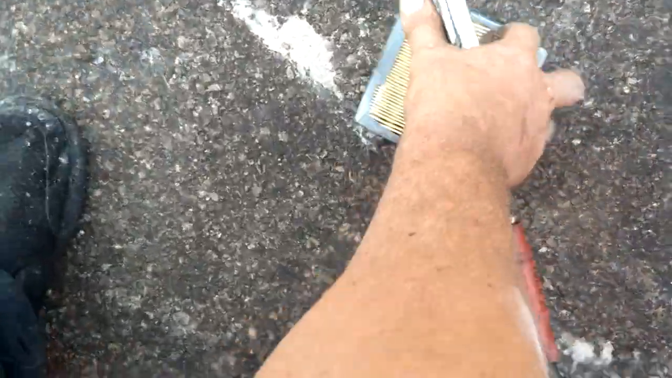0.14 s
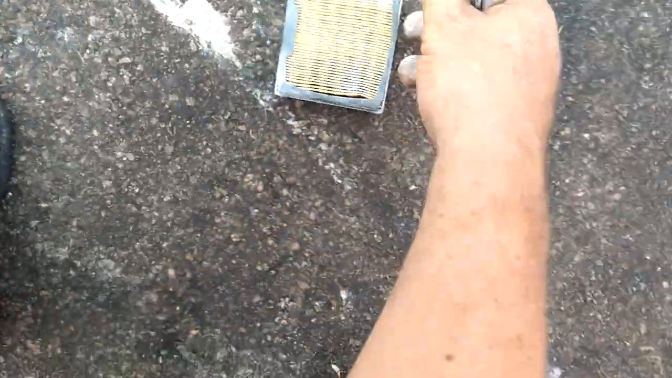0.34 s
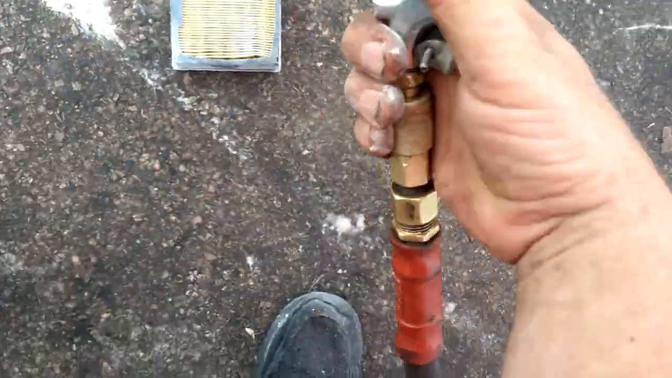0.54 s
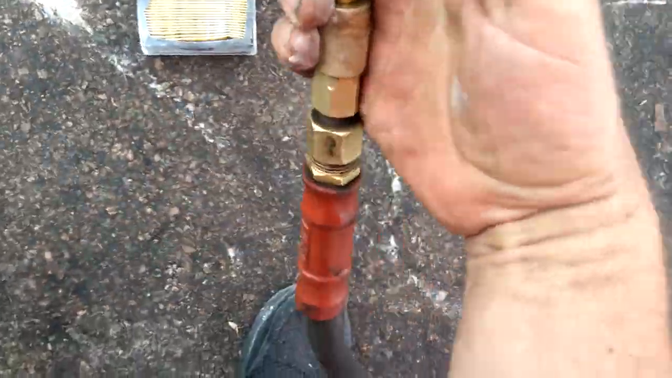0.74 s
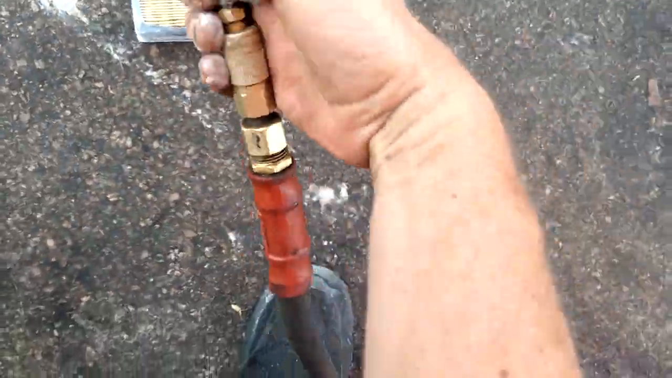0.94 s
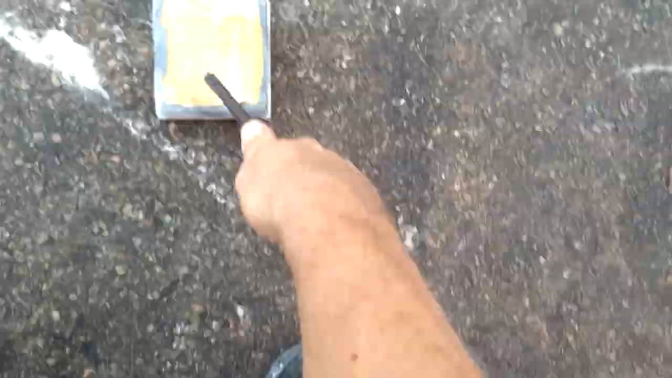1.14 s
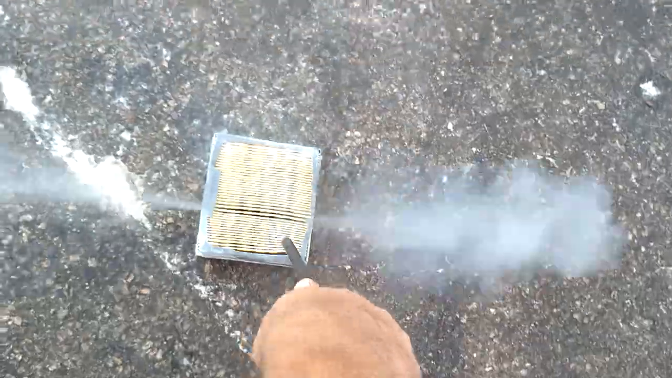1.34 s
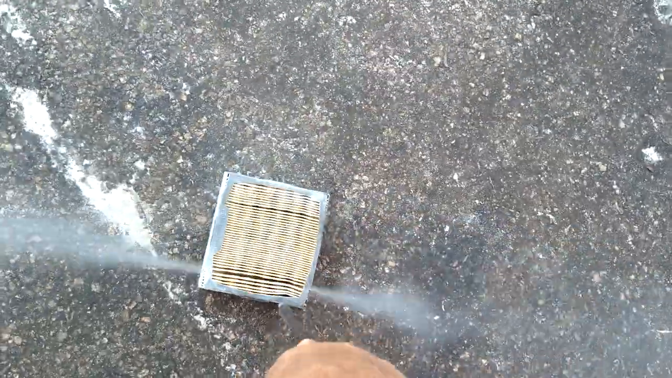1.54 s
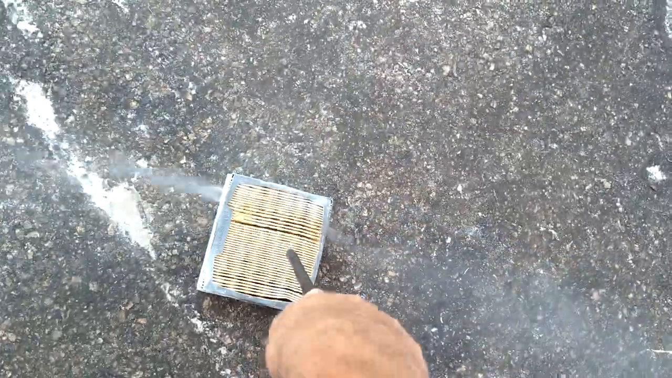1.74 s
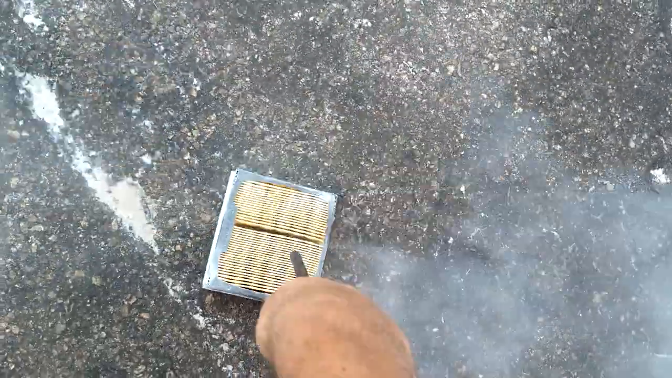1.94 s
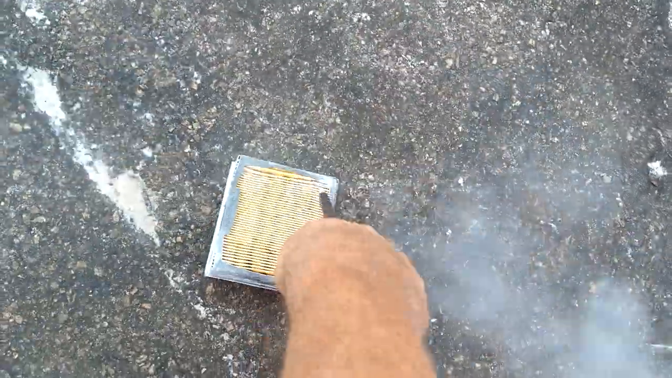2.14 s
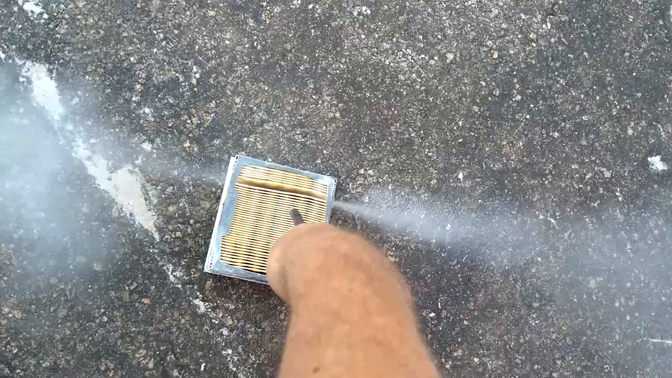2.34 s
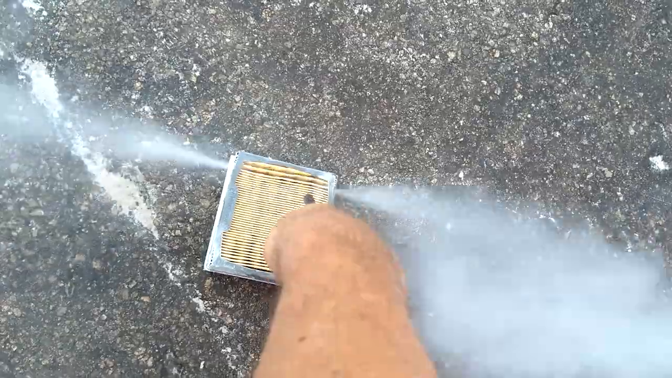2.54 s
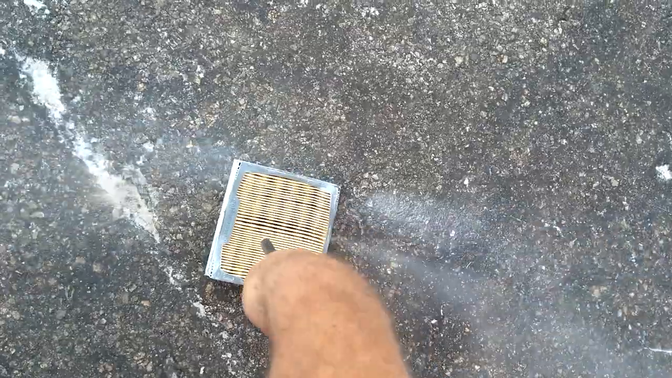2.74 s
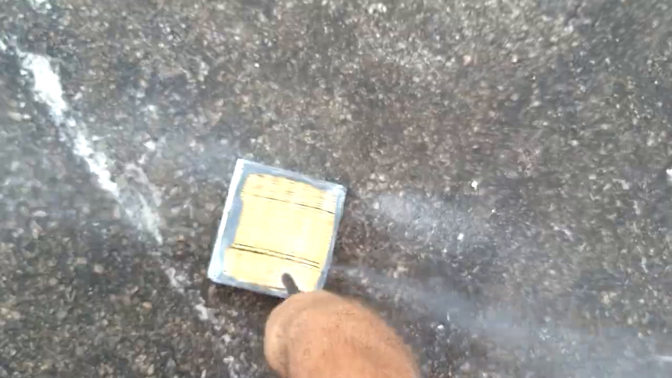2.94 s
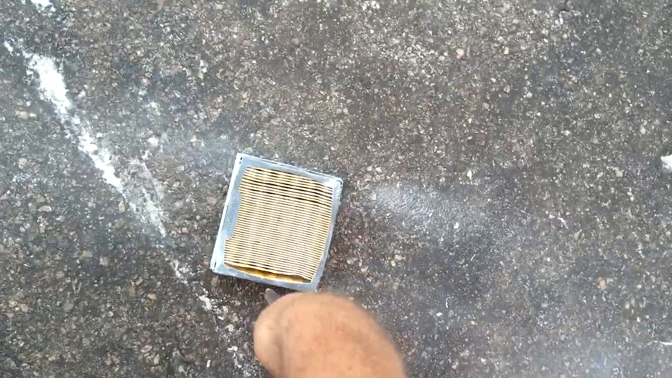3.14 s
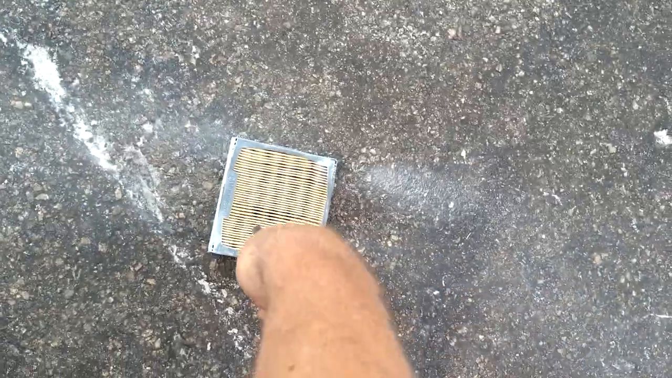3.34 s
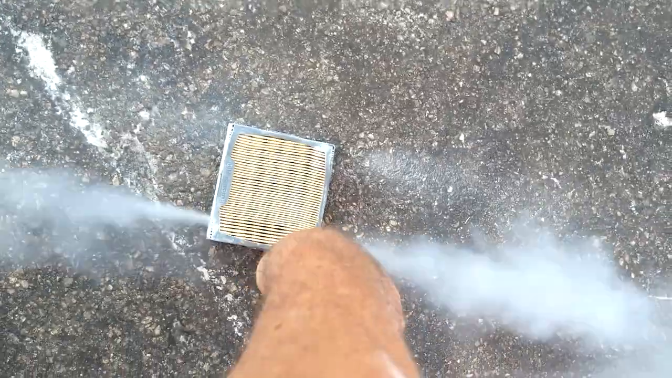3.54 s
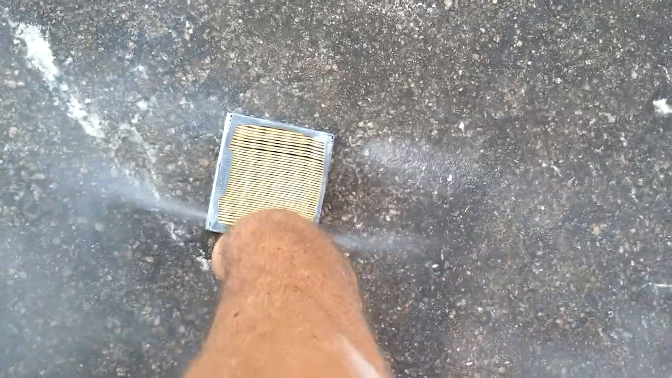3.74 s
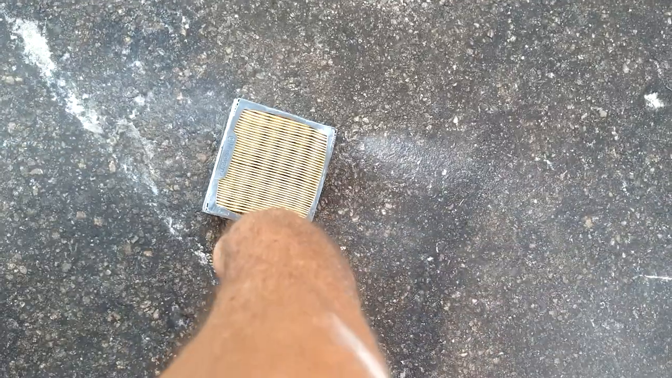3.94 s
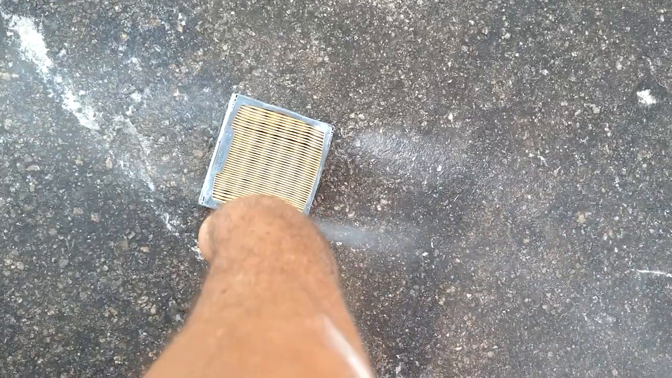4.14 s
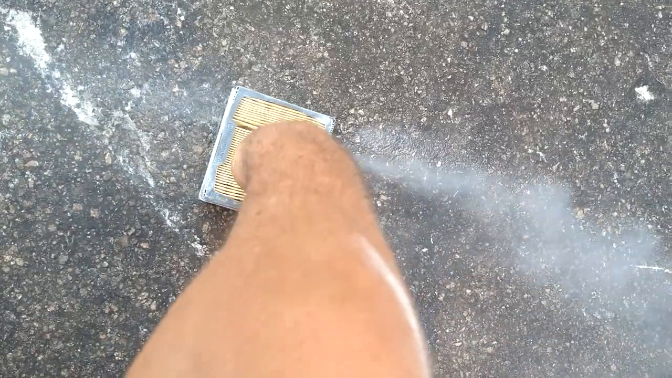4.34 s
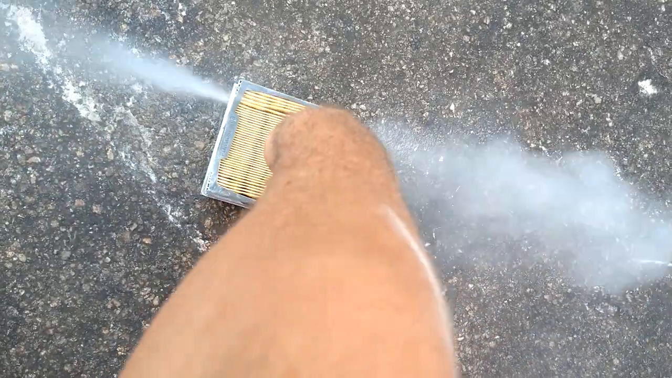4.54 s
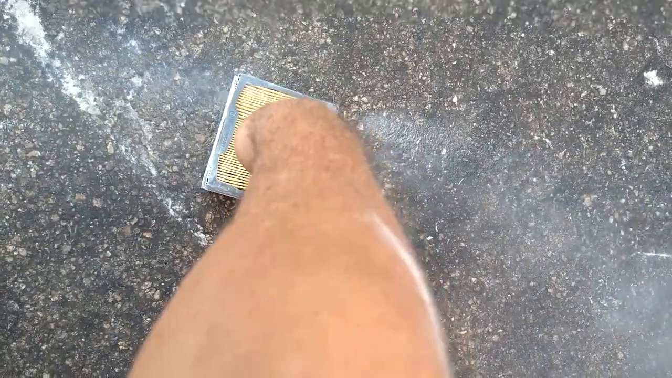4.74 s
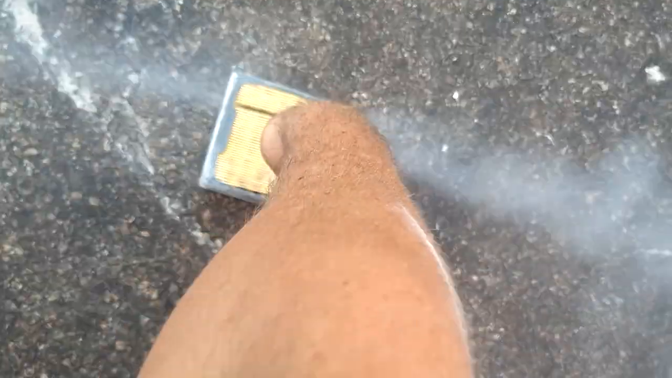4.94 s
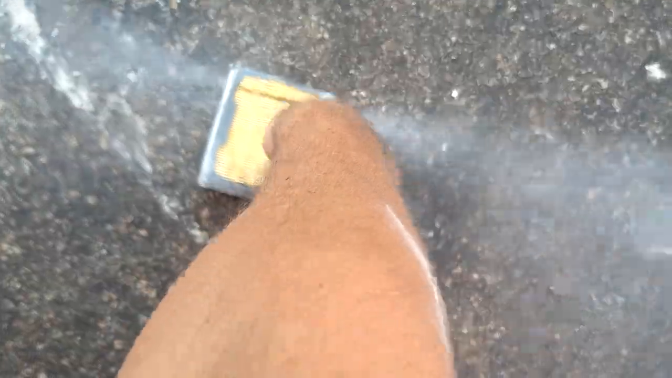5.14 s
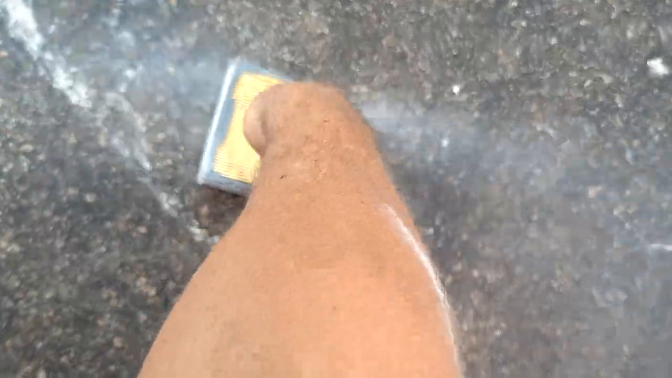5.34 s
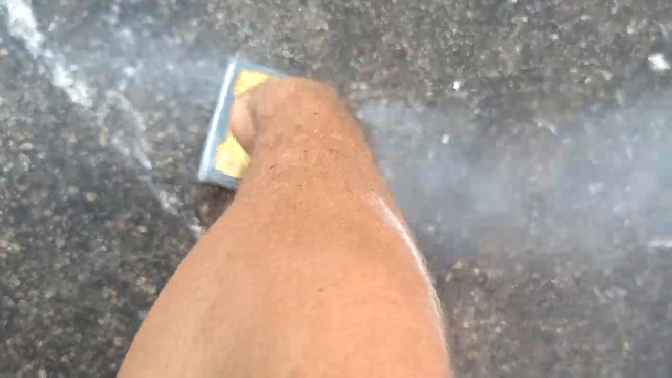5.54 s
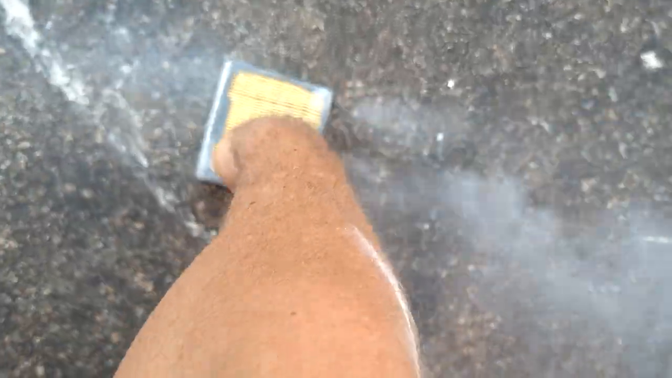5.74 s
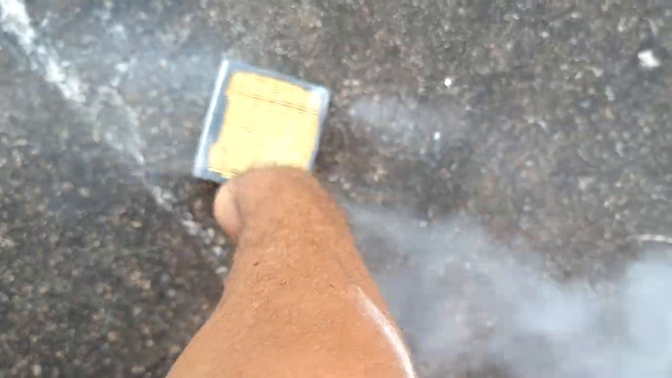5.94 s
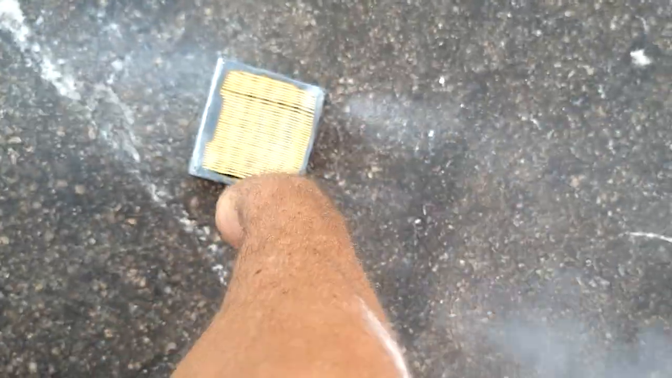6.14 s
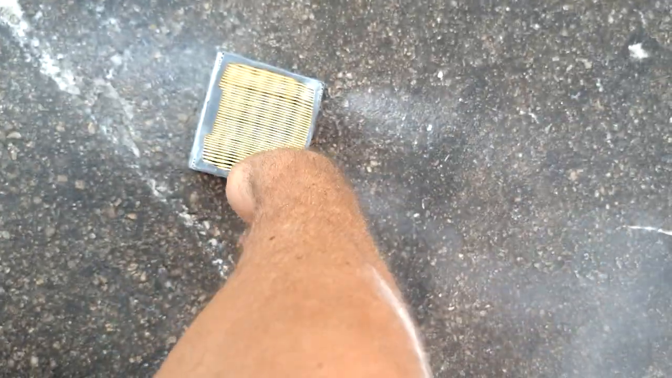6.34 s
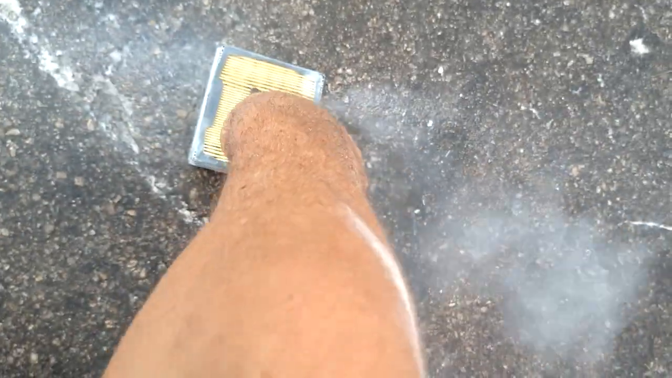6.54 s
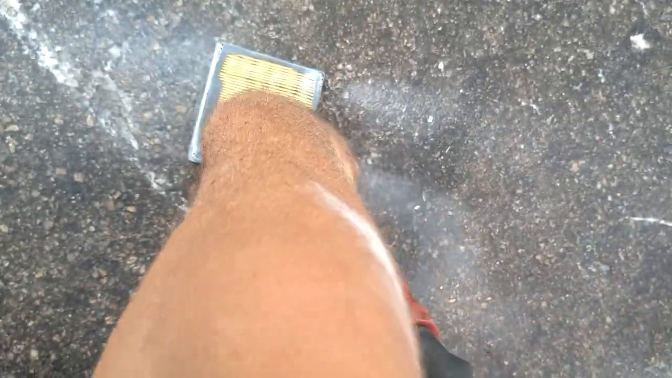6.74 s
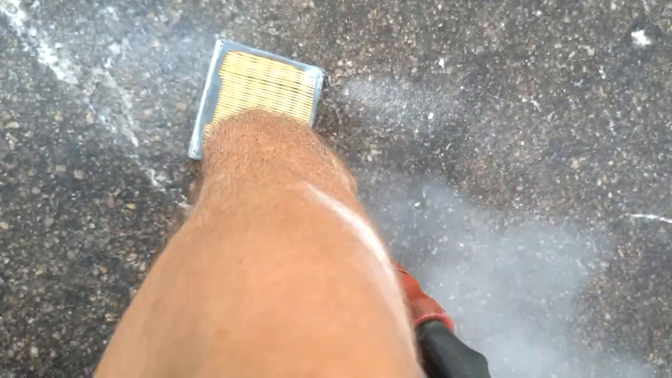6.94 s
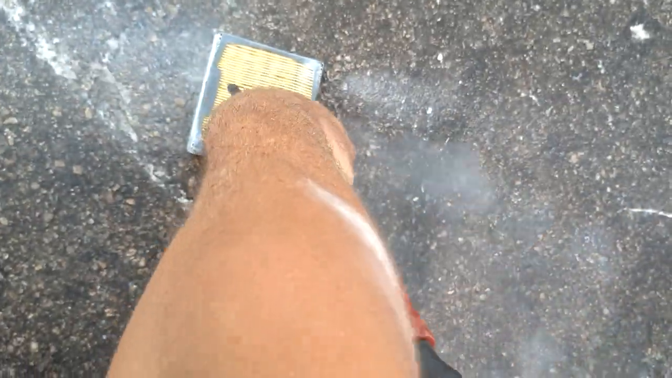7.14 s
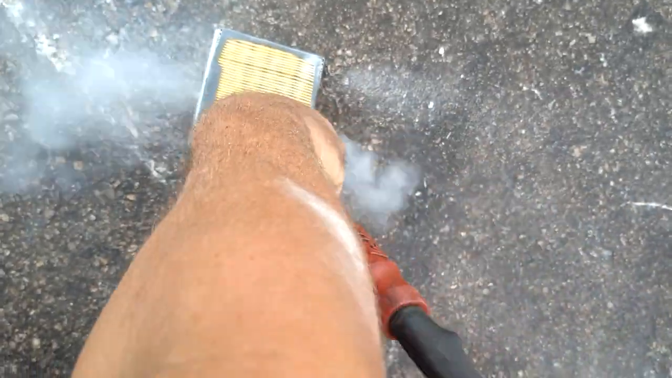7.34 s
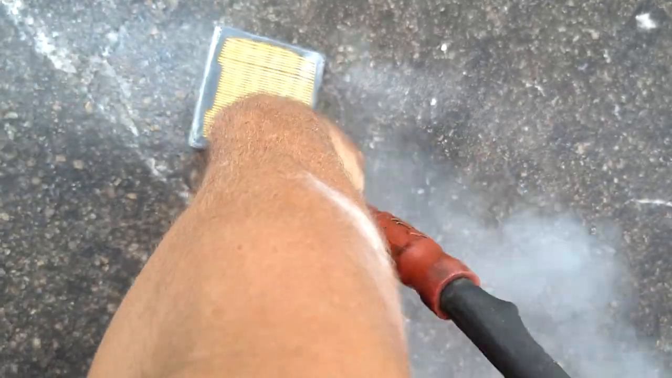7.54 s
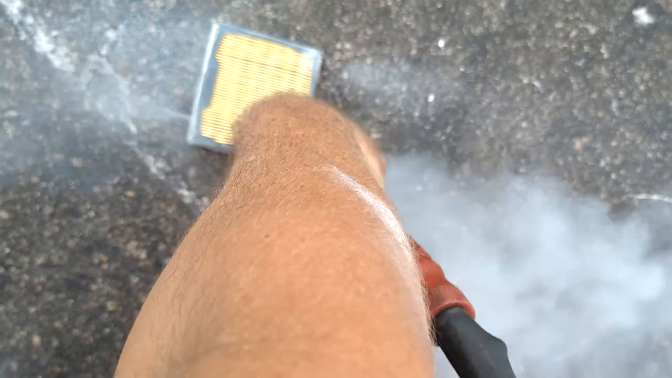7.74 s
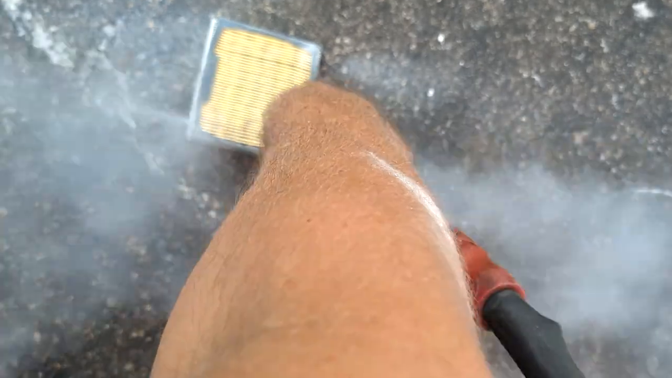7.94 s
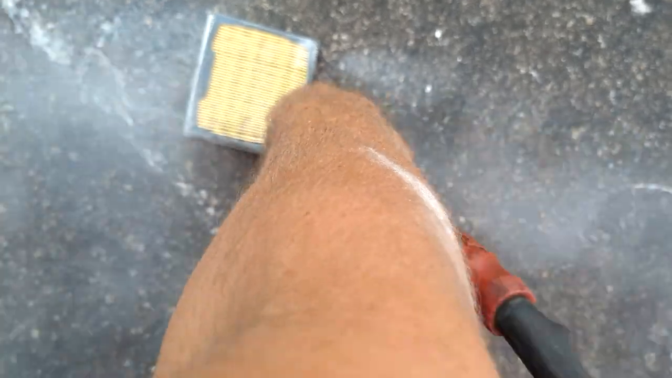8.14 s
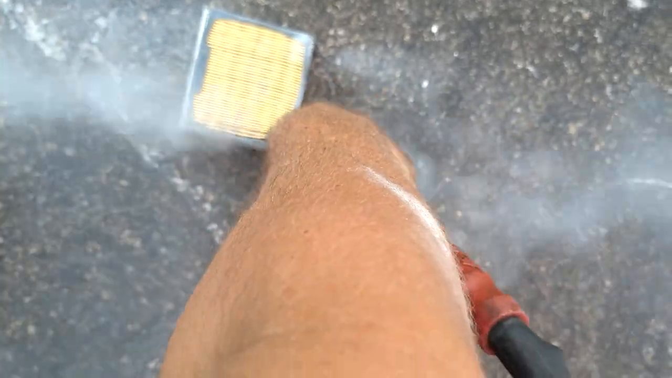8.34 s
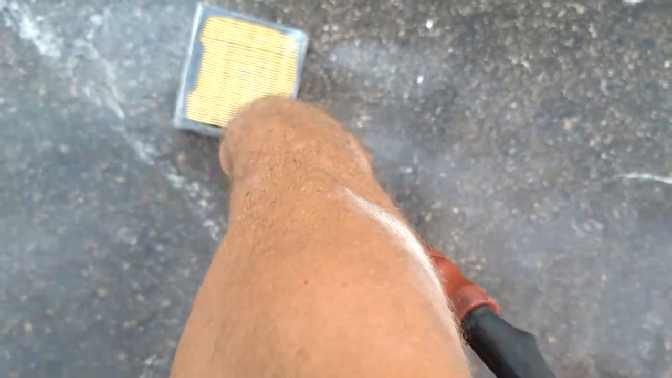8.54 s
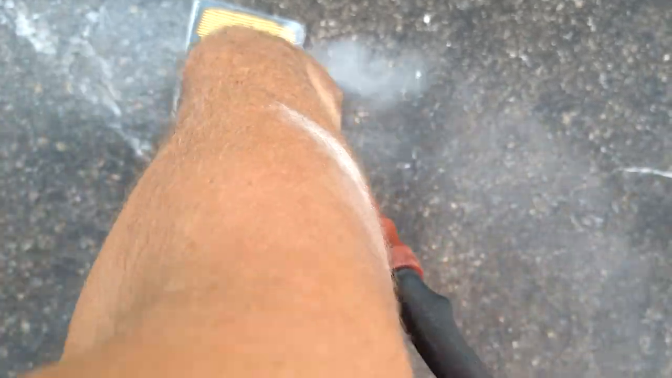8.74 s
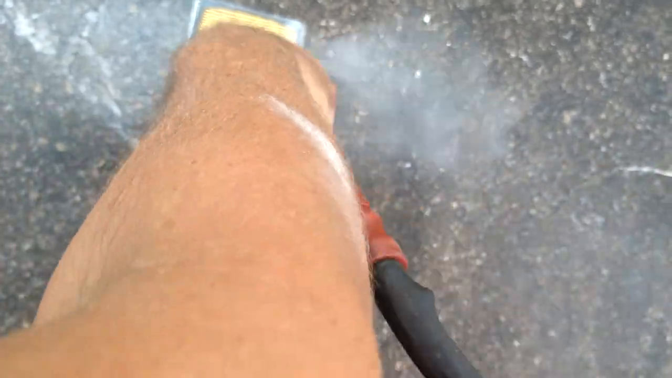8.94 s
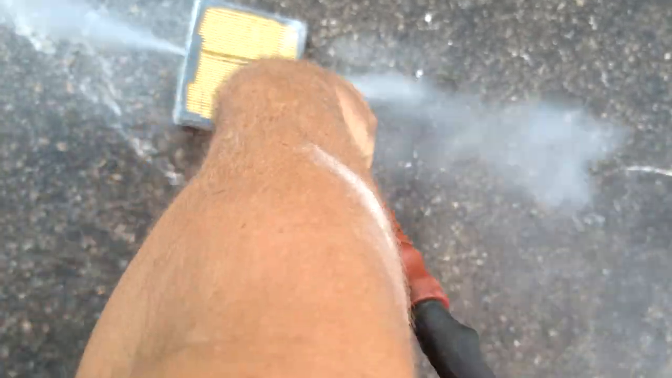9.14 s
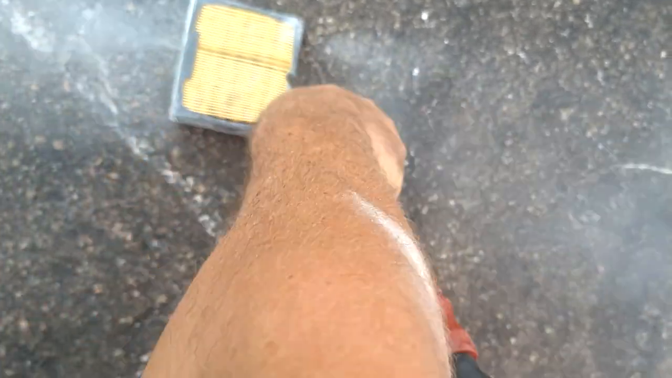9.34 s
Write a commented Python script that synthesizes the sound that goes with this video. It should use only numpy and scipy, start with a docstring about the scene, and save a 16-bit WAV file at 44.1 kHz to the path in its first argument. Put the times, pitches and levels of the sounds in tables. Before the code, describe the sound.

For under a second only a low, rapid compressor throb is heard, with a small metallic tick from the hose coupling. Then an air gun snaps open with a short fuller burst and holds a loud bright hiss to the end. Sweeping over filter pleats, it surges and drops, increasingly choppy, with brief hoots, dull puffs and tiny grit clicks. Close phone microphone over a hard concrete floor, dull at the very top.

```python
"""On a concrete floor a compressed-air blowgun sweeps over a pleated air filter, close to a phone.
The trigger opens a loud jet with a short burst: coloured noise that surges against each pleat and drops as it flips.
Wavering sines hoot in the pleats and whistle once on the rim; gated dull noise gusts against the floor.
Grit and the hose coupling tick, and a piston compressor throbs behind as a stack of crank harmonics with hiss."""
import sys
import numpy as np
from scipy import signal
from scipy.fft import rfft, irfft, next_fast_len
from scipy.io import wavfile
from scipy.ndimage import uniform_filter1d

SR = 44100
rng = np.random.default_rng(int(sys.argv[2]) if len(sys.argv) > 2 else 0)


def int16_out(signal):
    """Quantize to a 16-bit WAV file."""
    q = np.round(np.clip(np.atleast_2d(signal).T, -1, 1) * 32767)
    wavfile.write(sys.argv[1], SR, q.astype(np.int16))


N = 418509
TIME = np.arange(N) / SR
# the jet is shaped in short spectral frames
FRAME_S = np.arange(N // 128 + 6) * 128 / SR
BIN_HZ = np.fft.rfftfreq(512, 1 / SR)
FAST_N = next_fast_len(N)
FAST_HZ = np.fft.rfftfreq(FAST_N, 1 / SR)

# the trigger valve cracks open: (time [s], level [dB])
VALVE = [(0.788, -70), (0.8, -41), (0.819, -19), (0.827, 0)]


def gain_of(db):
    """Decibels to amplitude."""
    return 10 ** (np.asarray(db) / 20)


def evened(x):
    """Scales to rms 1."""
    return x / np.sqrt(np.mean(x ** 2) + 1e-20)


def read(points, hz):
    """Reads a spectrum table on a log-frequency axis."""
    f, value = np.transpose(points)
    return np.interp(np.log(hz + 1), np.log(f + 1), value)


def follow(rows, t):
    """The columns of a curve table at times t."""
    s, *columns = np.transpose(rows)
    return [np.interp(t, s, column) for column in columns]


def hump(hz, centre_hz, width_hz):
    """A bell of height 1 in a spectrum; it has fallen to exp(-2) at width_hz from its centre."""
    return np.exp(-2 * np.minimum(((hz - centre_hz) / width_hz) ** 2, 20))


def swell(s, length):
    """A flat-topped rise and fall around time s."""
    return np.clip(1.6 - 2 * abs(TIME - s) / length, 0, 1)


def noise(colour):
    """Steady noise of rms 1 with the given spectrum."""
    spectrum = rfft(rng.standard_normal(FAST_N)) * gain_of(read(colour, FAST_HZ))
    return evened(irfft(spectrum, FAST_N)[:N])


def wander(rate_hz):
    """Random movement of rms 1, up to about the given rate."""
    spectrum = rfft(rng.standard_normal(FAST_N)) * hump(FAST_HZ, 0, np.sqrt(2) * rate_hz)
    return evened(irfft(spectrum, FAST_N)[:N])


def patches(size):
    """Random patches of rms 1 over time and frequency, size = (frames, bins)."""
    field = rng.standard_normal((len(FRAME_S), len(BIN_HZ)))
    along_time = uniform_filter1d(field, size[0], axis=0)
    return evened(uniform_filter1d(along_time, size[1], axis=1))


def jet(narrow_db=1.25, broad_db=0.5, ripple_db=0.82, notch_share=0.44,
        flutter_db=0.06, late_flutter_db=0.74, flutter_hz=25,
        gurgle_db=0.73, late_gurgle_db=0.9, gurgle_hz=16,
        burst_db=3, burst_rush_db=6.5, rush_flip_share=0.41):
    """Turbulent noise, coloured by the gap under the nozzle and chopped by the pleats it crosses."""
    # underlying level of the jet: (time [s], level [dB])
    jet_level = [(.83, -16), (1.3, -14.5), (2.3, -14.5), (3.2, -14.5), (3.9, -15), (6.3, -15), (9.49, -15)]
    # jet noise: (frequency [Hz], relative density [dB per Hz])
    jet_colour = [(60, -50.5), (200, -27.5), (480, -24), (620, -20), (800, -7.5), (1200, -9.5), (1780, -9),
                  (2100, -4), (3200, -5), (3900, 0.5), (5800, -0.5), (7000, -4), (7680, -6.5), (8400, -33)]
    # resonances and notches of filter frame and gap: (frequency [Hz], half-width [Hz], level [dB])
    gap_modes = [(870, 67, -1.3), (1385, 62, 5.5), (1557, 99, 5.5), (1740, 120, 0.2), (2180, 110, -0.8),
                 (2420, 230, 3), (2720, 120, 0.5), (3320, 260, -0.5), (3750, 450, 0.8), (4700, 300, -0.5),
                 (5700, 750, 0.8)]
    # the gap shifts as the hand moves over the filter: (time [s], factor on the low edge of the rush,
    # factor on the gap's resonances, level in the notch above the ring [dB])
    gap = [(1.1, 1.08, .93, 1.5), (1.9, 1.01, 1.0, 0), (2.801, 1, 0.99, 0), (3.4, 1.05, 1, 0.5),
           (6, 1.02, 1.017, 0.5), (7, 1.12, 1.005, 2), (8.7, 1.13, 0.97, 2), (9.3, 1.14, 1.01, -2.5)]
    # hollow ring under the nozzle: (time [s], level [dB])
    ring = [(.85, 0.7), (1.45, 4.5), (1.85, 1.5), (2.4, 3), (3.3, -0.5), (6.1, 0.5), (6.55, 1), (6.95, -4),
            (7.22, 2), (8.5, -2), (8.92, 1), (9.12, -2), (9.49, -6.5)]
    # top sizzle: (time [s], level [dB])
    sizzle = [(.95, -1), (1.349, 1), (2.8, 0), (5.8, 0.9), (6.45, -1.5), (7, -1), (8, -0.7), (8.45, 0.8),
              (8.85, -1.3), (9.49, 2.5)]
    # the low rush gurgles up in an open fold (+) or chokes in a shut one (-):
    # (time [s], level [dB], length [s])
    gurgles = [(1.18, 2, .22), (1.643, -4.5, .07), (1.747, 2, 0.05), (2.782, 1, .2), (2.962, -4, 0.033),
               (5.557, 3.5, 0.044), (5.736, 2, 0.086), (5.963, 2, 0.058), (6.247, 2.5, .08),
               (7.038, -5, 0.032), (7.219, 3.5, 0.019), (7.358, 4.5, 0.018), (7.417, 5.5, 0.022),
               (7.573, 3, 0.069), (7.923, 3.5, .07), (7.995, -3.5, 0.031), (8.151, 2.5, .08),
               (8.45, 3, .07), (8.94, 1.5, .04), (9.162, -1.5, 0.16)]

    t = FRAME_S[:, None]
    ring_db, = follow(ring, t)
    sizzle_db, = follow(sizzle, t)
    edge, tuning, notch_db = follow(gap, t)
    flips_db = pleat_flips(FRAME_S)

    # the gap shifts the low edge and the resonances
    hz = BIN_HZ / edge ** hump(BIN_HZ, 650, 700) / tuning ** hump(BIN_HZ, 2900, 2000)
    db = read(jet_colour, hz) + sum(d * hump(hz, f, w) for f, w, d in gap_modes)

    # the low rush leads the burst, feels the flips less than the hiss, and gurgles in the folds
    gurgles_db = np.interp(t, TIME, sum(d * swell(s, length) for s, d, length in gurgles))
    db += (burst_rush_db * burst(t) + gurgles_db) * hump(BIN_HZ, 1100, 1150)
    db -= (1 - rush_flip_share) * flips_db[:, None] * hump(BIN_HZ, 1500, 1900)

    # small random gurgles and flutter grow with time, as the nozzle works closer to the paper
    closeness = TIME / TIME[-1]
    small_gurgles_db = (gurgle_db + late_gurgle_db * closeness) * wander(gurgle_hz)
    db += np.interp(t, TIME, small_gurgles_db) * hump(BIN_HZ, 860, 650)
    flutter = (flutter_db + late_flutter_db * closeness) * wander(flutter_hz)

    # ring and sizzle swell and fade against the hiss; a strong ring hollows out the band above it
    db += ring_db * hump(hz, 2300, 560)
    db += (notch_db - notch_share * ring_db) * hump(BIN_HZ, 3020, 480)
    db += sizzle_db * hump(BIN_HZ, 7700, 2200)

    # single pleats ring briefly, and wider bright bands come and go
    db += narrow_db * patches(size=(18, 3)) + broad_db * patches(size=(36, 9))
    # reflections off hand and floor leave a ripple that shifts slowly as the arm moves
    db += ripple_db * patches(size=(130, 3))

    random_bins = rng.standard_normal(db.shape) + 1j * rng.standard_normal(db.shape)
    spectra = gain_of(db) * random_bins
    hiss = evened(signal.istft(spectra.T, nperseg=512, noverlap=384)[1][:N])
    opening_db = follow(VALVE, TIME)[0] + burst_db * burst(TIME)
    chop_db = np.interp(TIME, FRAME_S, flips_db) + flutter
    return hiss * gain_of(follow(jet_level, TIME)[0] + opening_db + chop_db)


def pleat_flips(t, build_s=0.035, snap_s=0.02, recover_s=0.062):
    """Hiss level in dB as the jet bends each pleat: a surge, a quick snap over, a slump that recovers."""
    # (time of the flip [s], surge before it [dB], slump after it [dB])
    flips = [(1.432, 1, 4), (1.802, 2, .8), (2.458, 2.5, 1.5), (3.057, -0.5, 2.1), (3.364, -0.5, 4),
             (3.5, 0.5, 2.7), (3.617, 1.5, 1.5), (3.744, 4.5, 1.5), (3.993, 2, 0.7), (4.35, 3.5, 5.5),
             (4.5, 0, 4), (4.74, 3.5, 1), (5.092, 1.5, 3.3), (5.195, 4, -0.5), (5.382, -1, 3),
             (5.828, 1, 4), (6.013, 3, 0), (6.323, 0.5, 3), (6.593, 2.5, 4), (7.046, 0, 2.5),
             (7.158, 7.5, 7), (7.209, 3, 3), (7.34, 3, 2.5), (7.472, 2.5, 1.1), (7.692, 1.8, 4.5),
             (8.011, 3.7, 5.5), (8.184, 1, 2.5), (8.48, 0, 2.7), (8.69, 1, 3), (8.869, 1, 3.5),
             (8.974, 3.5, 2.5), (9.217, -2.5, 3.6), (9.414, 0, 4.5)]
    db = np.zeros(len(t))
    for s, surge_db, slump_db in flips:
        flipped = .5 + .5 * np.tanh((t - s) / snap_s)
        build = np.exp(-np.minimum(((t - s) / build_s) ** 2, 20))
        recovery = np.exp(-np.minimum(((t - s) / recover_s) ** 2, 20))
        db += surge_db * build * (1 - flipped) - slump_db * recovery * flipped
    return db


def burst(t, fade_s=0.1):
    """Pressure stored in the hose escapes first: 1 until the valve is fully open, then dying away."""
    since_open = np.maximum(t - VALVE[-1][0], 0)
    return np.exp(-np.minimum((since_open / fade_s) ** 2, 20))


def pleat_tones(hoot_waver=0.069, whistle_waver=0.0134, octave_db=-5):
    """Air across a pleat gives a rough hoot; on the sharp rim it whistles with a strong octave."""
    # a hoot or a brief fuzzy shrill in one pleat: (time [s], level [dB], pitch [Hz], length [s])
    hoot_rows = [(2.36, -20.5, 4200, 0.15), (2.99, -24, 6550, 0.033), (6.388, -30, 820, 0.0099),
                 (6.425, -30.5, 850, 0.014), (6.526, -29, 1060, 0.022), (6.557, -30, 830, 0.0082),
                 (7.115, -21.5, 1020, 0.018), (7.22, -27, 1530, 0.016), (7.363, -30, 856, .02),
                 (7.408, -25, 920, 0.013), (7.565, -32, 903, 0.066), (7.954, -20, 1030, 0.024),
                 (8.051, -32, 900, .025), (8.17, -32, 4220, 0.065)]
    # one edge tone on the filter rim: (time [s], level [dB], pitch [Hz], length [s])
    whistle_row = (7.028, -15, 3265, .023)

    # the wavers are rms shares of the pitch
    drift = np.cumsum(wander(200)) / SR
    hoots = np.zeros(N)
    for s, db, hz, length in hoot_rows:
        tone = np.sin(2 * np.pi * hz * (TIME + hoot_waver * drift))
        hoots += gain_of(db) * swell(s, length) * tone

    s, db, hz, length = whistle_row
    angle = 2 * np.pi * hz * (TIME + whistle_waver * drift)
    edge_tone = np.sin(angle) + gain_of(octave_db) * np.sin(2 * angle)
    whistle = gain_of(db) * swell(s, length) * edge_tone
    return np.sqrt(2) * (hoots + whistle)


def gusts(draught_db=-57, draught_swing_db=3):
    """Short dull puffs of air spilled onto the floor, over a faint uneven draught on the microphone."""
    # gusts that spill over the filter: (time [s], level [dB], length [s])
    gust_rows = [(0.85, -47, 0.068), (3.723, -41, 0.059), (4.465, -39, 0.1), (4.88, -40, 0.029),
                 (4.956, -30, 0.035), (5.07, -36.5, 0.037), (5.177, -37, 0.035), (5.363, -36, 0.043),
                 (5.552, -40, 0.035), (5.76, -35.5, 0.047), (5.93, -38, 0.032), (6.22, -35, 0.025),
                 (6.305, -44, 0.032), (8.93, -45, 0.051), (9.32, -32, 0.045), (9.372, -30, 0.032),
                 (9.424, -32.5, 0.046)]
    # a gust: (frequency [Hz], relative density [dB per Hz])
    gust_colour = [(30, -20), (110, 3), (300, 0.5), (600, 3), (1200, -0.5), (3000, -22)]
    # draught, relative to draught_db: (time [s], level [dB])
    draught_level = [(1.5, -14), (2.2, -3.5), (3.6, -12.5), (4.8, 2), (6.3, -1.5), (7.5, -12), (9, 0)]
    # its rumble: (frequency [Hz], relative density [dB per Hz])
    draught_colour = [(30, -31), (60, -8.5), (100, 1.5), (200, -7.5), (600, -22.5), (2000, -49.5)]

    puffs = noise(gust_colour) * sum(gain_of(db) * swell(s, length) for s, db, length in gust_rows)
    level_db = draught_db + follow(draught_level, TIME)[0] + draught_swing_db * wander(9)
    return puffs + noise(draught_colour) * gain_of(level_db)


def grit(per_s=4, grain_db=-14, grain_hz=4500, decay_s=.00025):
    """Grains of dirt shot loose click against the filter frame: short decaying sines at random times."""
    hits = (rng.random(N) < per_s / SR) * rng.uniform(.3, 1, N) * gain_of(follow(VALVE, TIME)[0])
    t = TIME[:200]
    click = np.exp(-t / decay_s) * np.sin(2 * np.pi * grain_hz * t)
    return gain_of(grain_db) * np.convolve(hits, click)[:N]


def coupling():
    """The brass hose coupling ticks as the hand shifts its grip: narrow noise that dies away."""
    # (time [s], level [dB], frequency [Hz], width [Hz], time to fall 60 dB [s])
    ticks = [(0.5237, -37, 5800, 2200, 0.0091), (0.752, -56.5, 5580, 1800, .09)]
    out = np.zeros(N)
    for s, db, hz, width_hz, t60 in ticks:
        ring = wander(width_hz / 2) * np.sin(2 * np.pi * hz * TIME)
        decay = np.exp(-np.log(1000) * np.minimum(abs(TIME - s) / t60, 2))
        out += (TIME >= s) * gain_of(db) * decay * ring
    return out


def compressor(jitter_turns=0.0037, uneven_db=1.5, tone_db=-1.6, hiss_db=-9):
    """Every turn of the crank sends one rounded puff through the intake; the valves hiss."""
    # crank: (time [s], speed [turns per s])
    crank = [(0, 27.08), (0.7, 26.92), (1.4, 26.8), (2.1, 26.92), (2.7, 26.88), (3.4, 26.91), (6, 26.99),
             (7.1, 26.74), (7.7, 26.99), (8.8, 26.83), (9.49, 26.93)]
    # one turn of the pump through its intake: (multiple of the crank speed, relative level [dB])
    pump_orders = [(1, -39.5), (2, -34.5), (3, -19), (4, -10.5), (5, -7.5), (6, 1.5), (7, 1.5), (8, -30),
                   (9, -2), (10, -5.5), (11, -18), (12, -12), (13, -16.5), (14, -21), (15, -14), (16, -16),
                   (17, -12), (18, -12.5), (19, -36.5), (20, -28), (21, -18.5), (22, -38.5), (23, -28.5),
                   (24, -18), (25, -31.5), (26, -27), (27, -27.5), (28, -26.5), (29, -20), (30, -27),
                   (31, -28)]
    # how loud the throb is heard; it sinks behind the jet: (time [s], level [dB])
    throb = [(0, -30.5), (.82, -31.5), (.92, -39), (1.4, -47), (2.2, -45.5), (3.45, -43.5), (3.72, -42),
             (4, -43.5), (6.55, -41.5), (6.95, -36), (8.2, -39), (9.49, -35)]
    # valve hiss and background noise around the pump: (frequency [Hz], relative density [dB per Hz])
    pump_hiss = [(18, -66.5), (30, -38), (173, -5), (258, -9), (366, -12.5), (462, -15.5), (532, -17),
                 (755, -15.5), (1200, -22.5), (2860, -31.5), (4160, -42.5), (6950, -46.5), (8000, -58.5),
                 (10400, -101), (17600, -120)]

    order, db = np.transpose(pump_orders)
    speed = follow(crank, TIME)[0]
    turns = .19 + np.cumsum(speed) / SR + jitter_turns * wander(18)
    # each puff droops in pitch, its bass arriving last; reflections scatter the high orders
    hz = order * speed.mean()
    droop = 4.2 * (hz / 200 - 1) ** 2
    scatter = rng.uniform(-1, 1, len(order)) * (hz / 240) ** 2
    puffs = np.zeros(N)
    for k, d, phase in zip(order, db, droop + scatter):
        puffs += gain_of(d) * np.cos(2 * np.pi * round(k) * turns + phase)
    puffs = evened(puffs) * gain_of(tone_db + uneven_db * wander(22))
    hiss = gain_of(hiss_db) * noise(pump_hiss)
    return gain_of(follow(throb, TIME)[0]) * (puffs + hiss)


def scene():
    """Everything reaches one microphone, heard alike on both sides."""
    mono = jet() + pleat_tones() + gusts() + grit() + coupling() + compressor()
    return np.array([mono, mono])


def record(dry, knee=.65, headroom=.25, edge_hz=8500):
    """The phone rounds off the highest peaks, then cuts the treble steeply above edge_hz."""
    over = np.maximum(abs(dry) - knee, 0)
    limited = dry - np.sign(dry) * (over - headroom * np.tanh(over / headroom))
    low_pass = signal.firwin(401, edge_hz, window=("kaiser", 9), fs=SR)
    return signal.oaconvolve(limited, low_pass[None], "same", axes=1)


dry = scene()
out = record(dry)
int16_out(out)
```